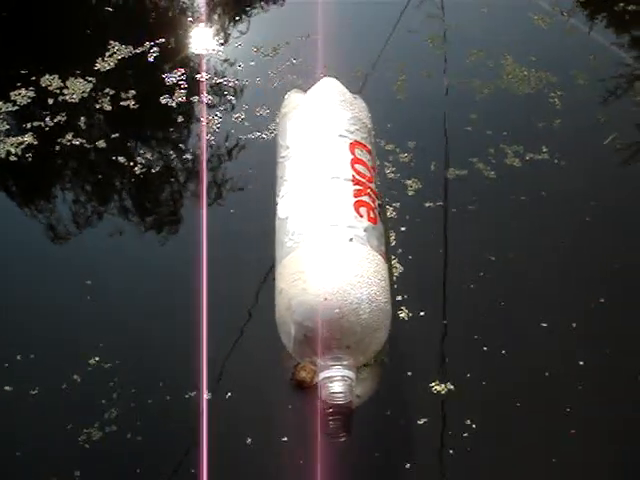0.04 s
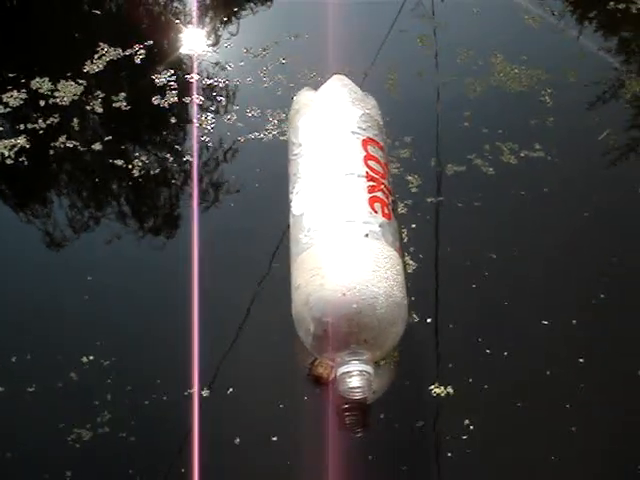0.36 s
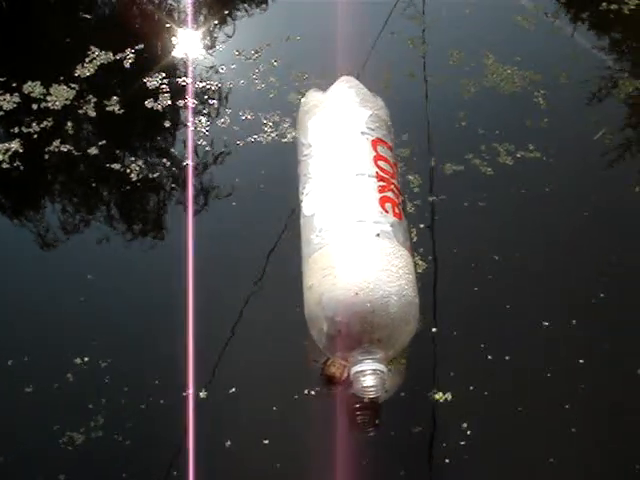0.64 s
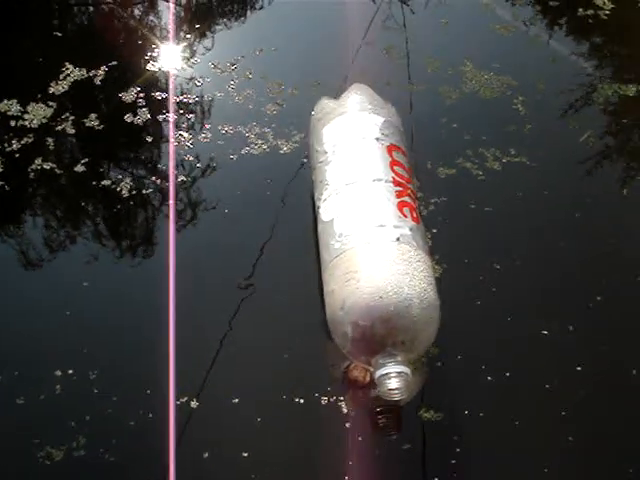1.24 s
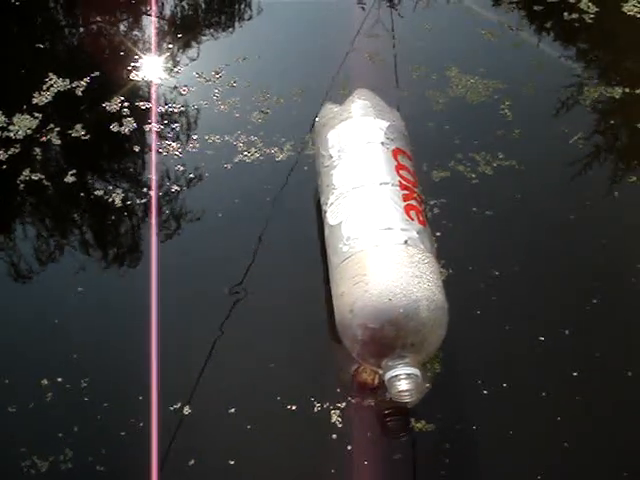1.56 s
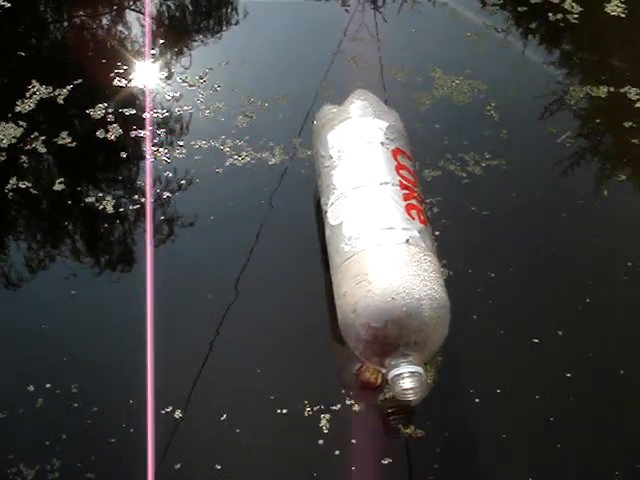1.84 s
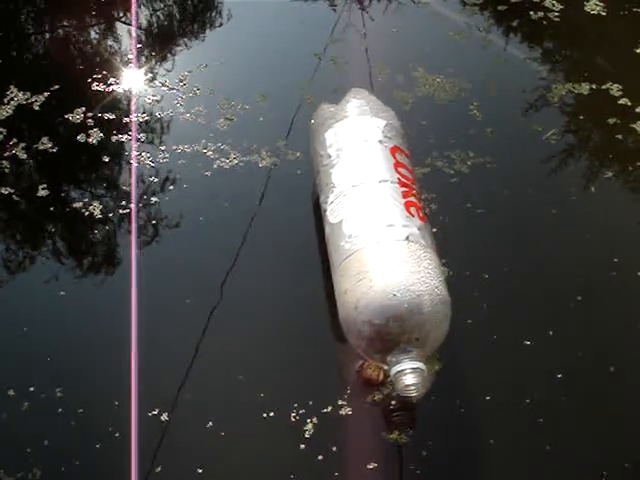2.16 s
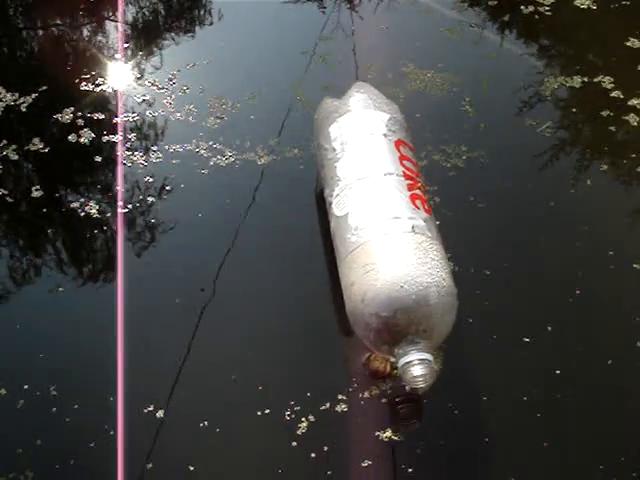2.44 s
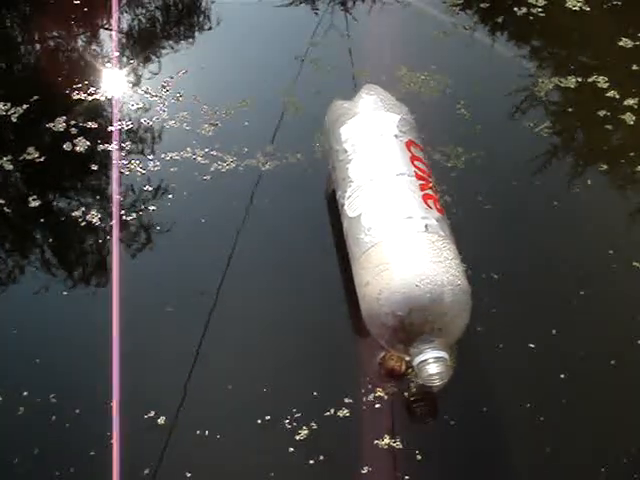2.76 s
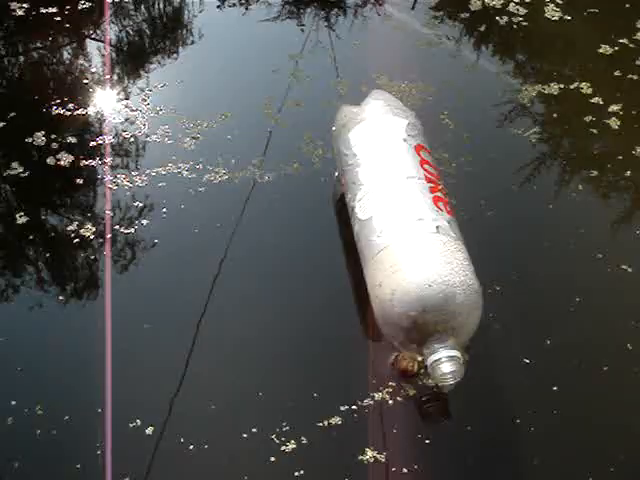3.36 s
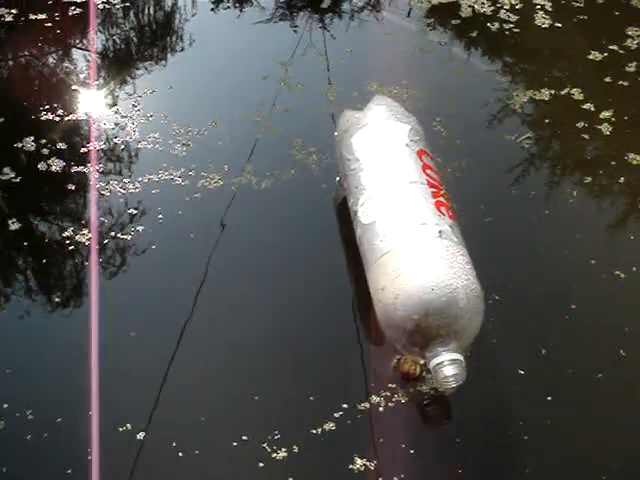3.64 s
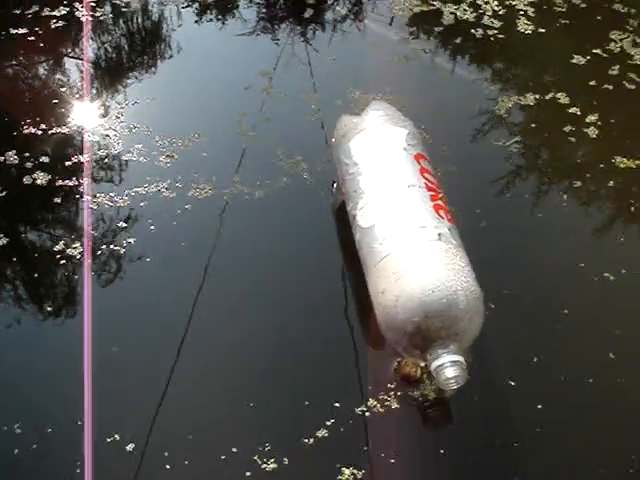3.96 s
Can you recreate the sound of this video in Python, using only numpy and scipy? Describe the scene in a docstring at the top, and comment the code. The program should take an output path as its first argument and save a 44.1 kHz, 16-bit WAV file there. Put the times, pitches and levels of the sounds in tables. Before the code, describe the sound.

A vehicle passes close by, its tyre roar swelling and brightening, then sinking in pitch with the exhaust drone. Distant traffic and a low road rumble carry on, heard from the side of a canal.

```python
"""Fast traffic beside a canal

One microphone at the canal side, mono. A vehicle passes close: its tyre roar swells and brightens,
and tyres and exhaust drone sink in pitch together as it goes by. Further off, the wash of the
traffic behind it stays on, with a second, fainter engine and a low road rumble."""
import sys
import numpy as np
from scipy import signal
from scipy.fft import rfft, irfft
from scipy.io import wavfile
from scipy.ndimage import map_coordinates

SR = 44100
rng = np.random.default_rng(int(sys.argv[2]) if len(sys.argv) > 2 else 0)


def put_to_file(sound):
    """Save the sound as 16-bit audio at rate SR, in the file named by the first command-line argument."""
    columns = np.atleast_2d(sound).T  # one column per channel
    safe = np.clip(columns, -1, 1)
    whole_steps = np.round(safe * 32767)
    wavfile.write(sys.argv[1], SR, whole_steps.astype(np.int16))


N = 176400
T = np.arange(N) / SR


def from_db(db):
    """Decibels to gain."""
    return 10 ** (np.asarray(db) / 20)


def rms_one(x):
    """Scale to unit rms."""
    return x / np.sqrt(np.mean(x ** 2) + 1e-20)


def in_time(rows):
    """Join rows of (t/s, value) by straight lines."""
    return np.interp(T, *np.transpose(rows))


def drift(rate_hz):
    """Slow random wandering with spread 1."""
    step, run_in = 40, 2000  # samples per step, steps for the filter to settle
    pole = np.exp(-2 * np.pi * rate_hz * step / SR)
    white = rng.standard_normal(N // step + run_in + 2)
    slow = signal.lfilter([1], [1, -2 * pole, pole * pole], white)[run_in:]
    return np.interp(np.arange(N) / step, np.arange(len(slow)), rms_one(slow))


def noise(spectrum, pitch=None):
    """Unit noise with a spectral density of (f/Hz, level/dB) rows, shifted by an optional pitch ratio."""
    hz, db = np.transpose(spectrum)
    f = np.maximum(np.fft.rfftfreq(2 * N, 1 / SR), 1)
    skirts = np.minimum(f / hz[0], 1) ** 2 * np.minimum(hz[-1] / f, 1) ** 2
    colour = from_db(np.interp(np.log(f), np.log(hz), db))
    x = irfft(rfft(rng.standard_normal(2 * N)) * skirts * colour)
    if pitch is None:
        return rms_one(x[:N])
    return rms_one(map_coordinates(x, [np.cumsum(pitch)], order=3, mode="wrap"))


def engine(note_hz):
    """Engine orders sounding together on a slightly unsteady exhaust note."""
    # engine orders: multiple of the exhaust note, level/dB
    orders = [(.5, -27), (1, -1), (1.5, -13), (2, -18.5), (3, -21.5)]
    wavering_hz = note_hz * (1 + .008 * drift(rate_hz=7.1))
    phase = 2 * np.pi * np.cumsum(wavering_hz) / SR
    tones = (from_db(db) * np.sin(order * phase + rng.uniform(0, 2 * np.pi)) for order, db in orders)
    return np.sqrt(2) * sum(tones)


def road_rumble():
    """The low, nearly even rumble of the road in the background."""
    # rumble spectrum: f/Hz, level/dB
    spectrum = [(50, -18.5), (85, -2), (130, -1), (170, 1.5), (205, -2), (250, -1), (330, -6.5),
                (480, -7.5), (700, -10), (2000, -25.5)]
    # rumble at the microphone: t/s, level/dB
    level = [(0, -25), (.7, -26), (1.5, -26.5), (2.3, -29.5), (3.2, -28), (4, -27)]
    return from_db(in_time(level)) * noise(spectrum)


def traffic_wash():
    """The tyres of the following traffic, further off, merge into a rising wash."""
    # wash spectrum: f/Hz, level/dB
    spectrum = [(200, -12.5), (580, -8), (680, -1.5), (760, 1.5), (900, -2), (1050, -2.5), (1300, -6.5),
                (1600, -4.5), (1900, -2.5), (2300, -2.5), (2700, -10), (3500, -14), (5000, -21),
                (7000, -27.5), (10000, -42)]
    # wash at the microphone: t/s, level/dB
    level = [(0, -35), (.5, -30), (1.3, -28), (2.1, -25), (2.7, -23.5), (3.4, -24), (4, -23)]
    return from_db(in_time(level)) * noise(spectrum)


def far_engine():
    """A second engine, distant and still approaching, holds its note."""
    # far engine at the microphone: t/s, level/dB
    level = [(0, -35.5), (1.3, -39), (1.55, -29), (2.0, -36.5), (3.0, -41), (3.45, -28.5), (4, -39.5)]
    return from_db(in_time(level)) * engine(note_hz=118.8)


def trailing_rumble():
    """Deep rumble that trails the near vehicle."""
    # deep rumble spectrum: f/Hz, level/dB
    spectrum = [(20, -18), (35, -3.5), (55, 1.5), (80, -0.5), (120, -15), (300, -38.5)]
    # deep rumble at the microphone: t/s, level/dB
    level = [(0, -40), (.3, -44), (.7, -37), (1.2, -39), (1.6, -32.5), (2.2, -36.5), (3.2, -33.5),
             (4, -38.5)]
    return from_db(in_time(level)) * noise(spectrum)


def body_rush(pitch):
    """One low swell as the body of the vehicle goes by."""
    # rush spectrum: f/Hz, level/dB
    spectrum = [(40, -14), (85, -0.5), (143, 2.5), (190, -12), (245, -2), (325, -1.5), (400, -1.5),
                (510, -24.5), (1500, -34.5)]
    peak_db, peak_s, half_width_s = -23.5, 1.28, .32
    swell = from_db(peak_db) / (1 + ((T - peak_s) / half_width_s) ** 2)
    return swell * noise(spectrum, pitch)


def exhaust_drone(pitch):
    """The near vehicle's exhaust note swells and fades on the way, falling as it passes."""
    # drone at the microphone: t/s, level/dB
    level = [(0, -27), (.1, -25), (.17, -47), (.3, -40), (.36, -27), (.47, -27.5), (.57, -19.5), (.68, -22),
             (.77, -29.5), (.9, -23.5), (1.06, -31), (1.14, -19), (1.25, -20), (1.32, -29.5), (1.65, -26),
             (1.77, -37), (1.91, -24), (2.05, -37), (2.5, -31), (2.9, -38.5), (3.3, -31.5), (4, -44)]
    return from_db(in_time(level)) * engine(note_hz=103.1 * pitch)


def tread_hiss():
    """High hiss of the tread, heard mostly at close range."""
    # hiss spectrum: f/Hz, level/dB
    spectrum = [(1500, -19), (2800, 3), (3300, 2), (4000, 0), (5200, -4), (6500, -7.5), (8500, -14.5),
                (10000, -24.5)]
    # hiss at the microphone: t/s, level/dB
    level = [(0, -54), (.35, -53), (.75, -38), (1.15, -31.5), (1.49, -29), (1.75, -31.5), (2.15, -37),
             (2.8, -40), (3.3, -45), (4, -44)]
    return from_db(in_time(level)) * noise(spectrum)


def tread_whine():
    """A narrow band thrown forwards by the tread, sinking as the vehicle passes."""
    # whine band when centred on 2000 Hz: f/Hz, level/dB
    spectrum = [(1650, -28), (1890, -8), (2000, 0), (2110, -7), (2350, -28)]
    # centre of the band: t/s, f/Hz
    centre = [(0, 2290), (.85, 2250), (1.2, 2130), (1.8, 1960), (2.3, 1900), (4, 1830)]
    # whine at the microphone: t/s, level/dB
    level = [(0, -37.5), (.72, -35.5), (.78, -26.5), (1.0, -24), (1.3, -27.5), (1.65, -23), (2.05, -30),
             (2.4, -32), (2.8, -35.5), (4, -42)]
    return from_db(in_time(level)) * noise(spectrum, pitch=in_time(centre) / 2000)


def tyre_roar(pitch):
    """Tyres on the road, loudest near the microphone, following part of the pitch fall."""
    # roar spectrum at the nearest point: f/Hz, level/dB
    spectrum = [(150, -19.5), (500, -13.5), (700, -9.5), (920, -1.5), (1200, -7), (1500, -5), (1800, -2),
                (2030, -3.5), (2300, -4.5), (2700, -10), (3500, -19), (5000, -22.5), (9000, -48)]
    # roar at the microphone: t/s, level/dB
    level = [(0, -33), (.35, -31), (.7, -25), (1.0, -20.5), (1.22, -18.5), (1.5, -18), (1.75, -19),
             (2.1, -24), (2.6, -27.5), (3.2, -27.5), (4, -31)]
    fall_share = .7
    return from_db(in_time(level)) * noise(spectrum, pitch ** fall_share)


def passing_vehicle():
    """The close pass: Doppler shift makes it high on approach and low on leaving."""
    nearest_s, pass_s, doppler_share = 1.55, .62, .14
    receding = (T - nearest_s) / np.hypot(T - nearest_s, pass_s)  # -1 far ahead of the pass, +1 long after
    pitch = 1 - doppler_share * receding
    drone = exhaust_drone(pitch)
    tyres = tyre_roar(pitch) + tread_whine() + tread_hiss()
    air_waver = from_db(.4 * drift(rate_hz=9))  # moving air makes the tyre sound waver in level
    return drone + air_waver * tyres + body_rush(pitch) + trailing_rumble()


def scene():
    """The whole road at one microphone by the canal."""
    return (road_rumble() + traffic_wash() + far_engine() + passing_vehicle())[None]


def record(dry):
    """The microphone channel cuts the top steeply."""
    cutoff_hz = 10000
    f = np.fft.rfftfreq(2 * N, 1 / SR)
    low_pass = 1 / np.sqrt(1 + (f / cutoff_hz) ** 240)
    return irfft(rfft(dry, 2 * N) * low_pass)[:, :N]


dry = scene()
out = record(dry)
put_to_file(out)
```